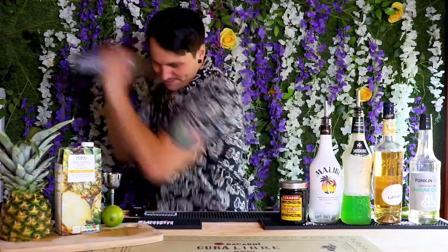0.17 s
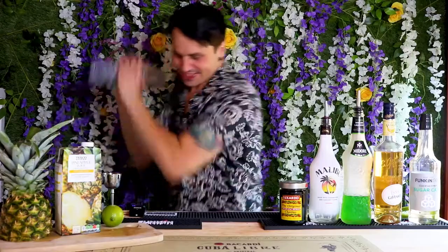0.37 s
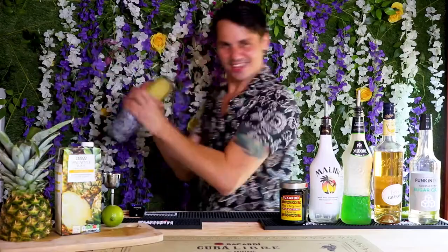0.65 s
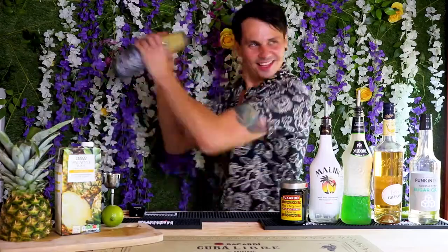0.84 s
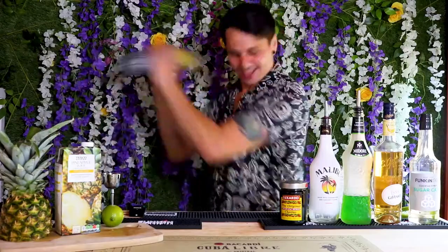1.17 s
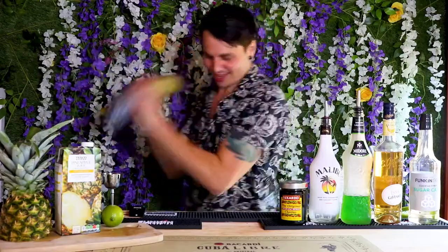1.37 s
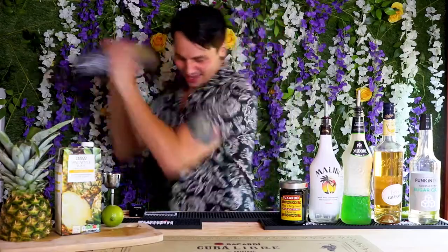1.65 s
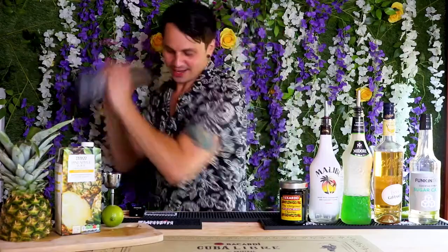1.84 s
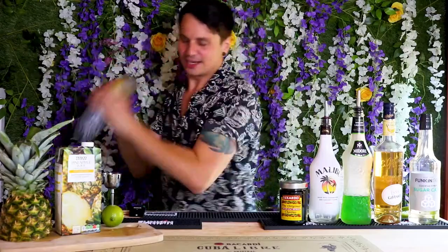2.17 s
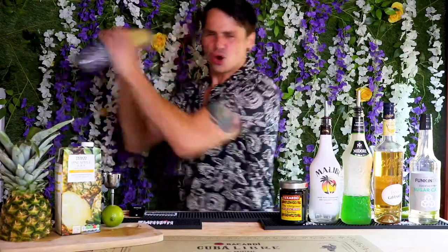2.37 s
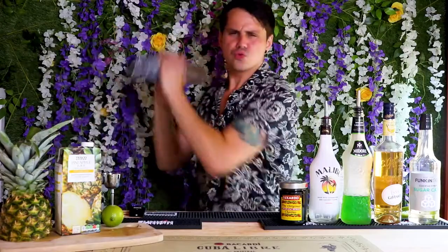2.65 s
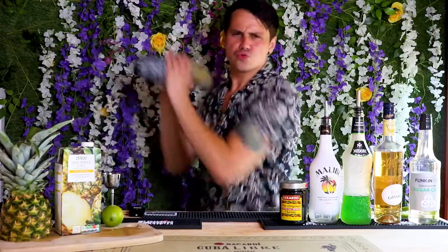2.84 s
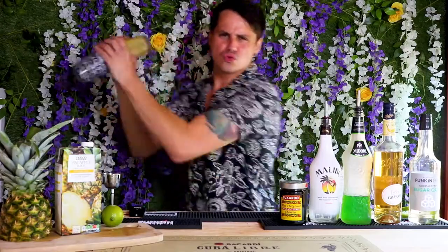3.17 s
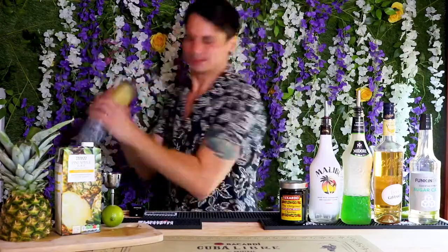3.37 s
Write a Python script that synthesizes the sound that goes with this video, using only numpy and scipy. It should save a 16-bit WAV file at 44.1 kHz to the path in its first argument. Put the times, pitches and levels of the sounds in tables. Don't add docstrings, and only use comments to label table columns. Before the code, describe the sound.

Vigorous cocktail shaking: ice cubes slam from end to end of a steel tin, ringing and tumbling after each blow, liquid gulping underneath; close, loud and clipped at peaks, short room tail, faint low hum.

```python
import sys
import numpy as np
from scipy import signal
from scipy.fft import rfft, irfft, next_fast_len
from scipy.io import wavfile
from scipy.ndimage import uniform_filter1d

SR = 44100
rng = np.random.default_rng(int(sys.argv[2]) if len(sys.argv) > 2 else 0)


def digitize_waveform(pressure):
    field = np.atleast_2d(pressure).T
    bounded = np.clip(field, -1, 1)
    quanta = np.round(bounded * 32767).astype(np.int16)
    wavfile.write(sys.argv[1], SR, quanta)


def volts(x):
    e = np.asarray(x, float) / 20
    return 10 ** e


N = 154350


def unit(x):
    return x / np.sqrt(np.mean(x ** 2) + 1e-20)


def along(points, hz):
    f, v = np.transpose(points)
    return np.interp(np.log(hz + 1), np.log(f + 1), v)


def filtered(x, response):
    m = next_fast_len(N + SR // 2)
    return irfft(rfft(x, m) * response(np.fft.rfftfreq(m, 1 / SR)), m)[..., :N]


def patchy(x, depth_db):
    z = signal.stft(x, nperseg=256)[2]
    field = uniform_filter1d(rng.standard_normal(z.shape), 4, -2)
    field = uniform_filter1d(field, 9, -1)
    field = field + field[:1]
    return signal.istft(z * volts(depth_db * unit(field)), nperseg=256)[1][..., :N]


def shape(t, rise_s, t60_s):
    t = np.maximum(t, 0)
    return (1 - np.exp(-t / rise_s)) * volts(-60 * t / t60_s)


def add(bus, s, sound):
    part = bus[..., round(max(s, 0) * SR):][..., :sound.shape[-1]]
    part += sound[..., :part.shape[-1]]


# t/s, level/dB
HUM_LEVEL = [
    (.3, -45),
    (1.15, -46),
    (1.65, -53),
    (2.3, -46),
    (3.25, -43),
    (3.5, -48),
]


def fridge():
    t = np.arange(N) / SR
    hum = volts(np.interp(t, *np.transpose(HUM_LEVEL))) * np.sin(2 * np.pi * 104.3 * t)
    second = volts(-64.5) * np.sin(2 * np.pi * 130.4 * t)
    noise = rng.standard_normal((3, N))
    rumble = filtered(noise[0] + 0.5 * noise[1:], lambda hz: hz / (hz + 30) / (1 + (hz / 420) ** 4))
    return np.sqrt(2) * (hum + second / np.sqrt(2)) + volts(-57) * unit(patchy(rumble, 1.9)) \
        + (1 - 1 / np.sqrt(2)) * np.sqrt(2) * second


# f/Hz, time to fall 60 dB/s
ROOM_DECAY = [(300, 0.22), (12000, 0.27)]


def room(x):
    step, delay = round(0.12 * SR), 200
    wet = np.zeros((2, N))
    padded = np.pad(x, ((0, 0), (step, 2 * step)))
    for start in range(0, N + step, step):
        hz, t, z = signal.stft(rng.standard_normal((2, SR // 3)), SR, nperseg=256)
        decay = volts(-60 * t / along(ROOM_DECAY, hz)[:, None])
        tail = signal.istft(z * decay, SR, nperseg=256)[1]
        piece = padded[:, start:start + 2 * step] * np.sqrt(np.hanning(2 * step))
        answer = signal.fftconvolve(piece, tail / np.linalg.norm(tail[0]), axes=1)
        add(wet, (start - step + delay) / SR, answer[:, max(step - start - delay, 0):])
    return wet


# t/s, level/dB
SPRAY_BURSTS = [
    (1.727, -14),
    (3.221, -13),
]


def spray():
    bus, t = volts(-41) * rng.standard_normal((2, N)), np.arange(SR // 4) / SR
    for s, db in SPRAY_BURSTS:
        add(bus, s, volts(db) * shape(t, 0.002, 0.1) * rng.standard_normal((2, len(t))))
    return filtered(bus, lambda hz: 1 / (1 + (8000 / (hz + 1)) ** 4))


# t/s, length/s, level/dB
SLOSH_HITS = [(0.098, 0.04, -33.5), (0.163, 0.31, -34.5), (0.334, 0.062, -31.5), (0.458, 0.19, -34.5),
              (0.63, 0.11, -29.5), (0.735, 0.034, -30.5), (0.828, 0.062, -32.5), (0.918, 0.037, -35),
              (1.001, 0.17, -31.5), (1.236, 0.055, -37), (1.384, 0.064, -28.5), (1.573, 0.048, -29.5),
              (1.68, 0.19, -31), (1.911, 0.16, -31.5), (2.135, 0.035, -26), (2.207, 0.066, -35),
              (2.413, 0.11, -31.5), (2.524, 0.084, -26), (2.645, 0.048, -30.5), (2.866, 0.02, -30),
              (2.908, 0.29, -34.5), (3.149, 0.026, -22.5), (3.236, 0.025, -27), (3.326, 0.096, -29),
              (3.43, 0.092, -33)]
# t/s, level/dB, f/Hz
AIR_BUBBLES = [
    (0.048, -37.5, 275),
    (.26, -34, 503),
    (.46, -27, 580),
    (0.651, -28, 481),
    (1.389, -27, 520),
    (1.86, -38, 304),
    (1.965, -30.5, 335),
    (3.145, -23.5, 577),
    (3.35, -33, 502),
]
# f/Hz, level/dB
WASH_COLOUR = [(88, -55), (150, -22), (624, -3.5), (883, -0.5), (1200, 0), (1600, -7), (2080, -19),
               (3520, -120)]


def drink():
    t, short = np.arange(N) / SR, np.arange(SR // 10) / SR
    power, bubbles = np.full(N, volts(-44) ** 2), np.zeros(N)
    for s, length, db in SLOSH_HITS:
        swell = 0.3 * length
        power += volts(db) ** 2 * np.exp(-((t - s - swell) / swell) ** 2)
    for s, db, hz in AIR_BUBBLES:
        rising = np.sin(2 * np.pi * hz * short * (1 + 2.17 * short))
        add(bubbles, s, volts(db) * shape(short, 0.0017, 0.14) * rising)
    noise = rng.standard_normal((3, N))
    wash = filtered(noise[0] + 0.21 * noise[1:], lambda hz: volts(along(WASH_COLOUR, hz)))
    return unit(patchy(wash, 3.2)) * np.sqrt(power) + bubbles


# t/s, level/dB, f/Hz
CHATTER_RUNS = [(.196, -22, 3770), (.635, -23, 2880), (.73, -23, 4600), (1.148, -23.5, 4400),
                (1.148, -31, 6550), (1.385, -26.5, 3270), (2.05, -23.5, 4250), (2.29, -24.5, 3730),
                (2.688, -30.5, 6500), (2.92, -26.5, 3300), (3.261, -25.5, 3350)]


def chatter():
    bus, t = np.zeros((2, N)), np.arange(SR // 10) / SR
    for s, db, hz in CHATTER_RUNS:
        taps = rng.standard_normal((3, len(t))) ** 3 / (1 + (t / 0.05) ** 6)
        ringing = signal.lfilter(*signal.iirpeak(hz, 8, SR), taps[0] + taps[1:])
        add(bus, s, volts(db) * unit(ringing))
    return bus


# t/s, level/dB, f/Hz
FREE_RINGS = [
    (.49, -7, 2075),
    (1.235, -11, 2090),
    (1.594, -0.5, 2078),
    (2.152, -11.5, 2070),
    (3.02, -9, 2092),
    (3.165, -10, 2100),
]


def free_rings():
    bus, t = np.zeros((2, N)), np.arange(SR // 3) / SR
    grip = 1 / (1 + (t / 0.04) ** 8)
    for s, db, hz in FREE_RINGS:
        tone = np.sin(2 * np.pi * hz * t) + 0.23 * np.sin(4 * np.pi * hz * t)
        add(bus, s, volts(db) * shape(t, 0.012, 0.2) * grip * tone)
    return bus


def ticks():
    contacts_per_s, size = 1500, 256
    count, t = round(contacts_per_s * N / SR), np.arange(size) / SR
    at, size_u, side = rng.random((count, 3)).T
    scatter = rng.standard_normal((count, 1))
    blow_s, _, blow_hz, _ = np.transpose(BLOWS_FIRST + BLOWS_SECOND)
    last_blow = np.maximum(np.searchsorted(blow_s, at * N / SR) - 1, 0)
    struck_hz = blow_hz[last_blow][:, None]
    same_cube = (side[:, None] * count % 1 < 0.2) & (struck_hz > 2300)
    any_hz = 3800 * np.exp(0.527 * scatter).clip(0.3, 3.5)
    hz = np.where(same_cube, struck_hz * np.exp(0.17 * scatter), any_hz)
    level_db = -2.9 * np.log(size_u[:, None] + 0.08)
    rings = volts(level_db - 60 * t * hz / 15) * np.sin(2 * np.pi * hz * t)
    lag = np.round(0.00013 * SR * (side - 0.5)).astype(int)[:, None]
    index = (at * N).astype(int)[:, None] + np.arange(size) + size
    sides = [np.bincount((index + k * lag).ravel(), rings.ravel(), N + 3 * size)[size:][:N] for k in (1, -1)]
    return unit(np.array(sides))


def tumble(fizz):
    t, power = np.arange(SR // 3) / SR, np.full(N, volts(-25.5) ** 2)
    for s, _, _, tumble_db in BLOWS_FIRST + BLOWS_SECOND:
        add(power, s - 0.005, (volts(tumble_db) * shape(t, 0.0088, 0.21)) ** 2)
    fizz_share = 0.22
    drive = np.sqrt(1 - fizz_share) * ticks() + np.sqrt(fizz_share) * fizz
    return patchy(drive, 2) * np.sqrt(power)


# t/s, peak level/dB, ring f/Hz, level of the tumble after it/dB
BLOWS_FIRST = [(0.0358, -1.5, 2210, -18.5), (0.1012, 2, 2110, -17), (0.1516, -10, 2140, -12),
               (0.1979, 3, 2410, -14.5), (0.2389, 5, 2205, -10), (0.3306, -6, 1910, -17),
               (0.4324, -27, 2080, -18), (0.4594, -7, 2230, -10.5), (0.5342, 8.5, 4300, -17),
               (0.5591, 11.5, 3730, -22), (0.6374, -2, 1820, -11), (0.7322, 0, 2180, -19.5),
               (0.7597, -5, 2110, -19), (0.7991, -18, 2530, -16.5), (0.8235, -15, 2060, -13.5),
               (0.8584, 1.5, 2140, -19.5), (0.9213, -0.5, 4040, -17.5), (1.0001, -21, 1980, -22),
               (1.0251, -9, 2210, -11.5), (1.1074, -20, 2190, -11.5), (1.1847, 4, 2106, -12.5),
               (1.2885, 0, 3800, -11), (1.3264, 6, 3560, -18), (1.3708, 1, 2330, -15),
               (1.4935, 0, 1980, -21), (1.5594, 2.5, 3300, -15), (1.5843, -0.5, 2050, -17),
               (1.6736, -7, 1900, -14.5)]
# t/s, peak level/dB, ring f/Hz, level of the tumble after it/dB
BLOWS_SECOND = [(1.7318, -9, 2000, -10), (1.7757, 5, 2090, -16.5), (1.8219, -12, 1940, -13.5),
                (1.9104, 1, 2104, -12.5), (2.0163, 0.5, 2160, -15), (2.042, -4, 1820, -11),
                (2.1518, 8.5, 2070, -23), (2.301, -2, 2185, -25), (2.3314, -1.5, 2160, -27),
                (2.4441, 1, 2480, -10.5), (2.4661, 0, 1990, -38), (2.5118, -13, 1930, -16),
                (2.5395, -11, 2120, -10.5), (2.5938, -12, 2120, -19), (2.6467, 3.5, 2090, -20),
                (2.6861, 8, 4670, -42), (2.7979, -4, 3630, -43), (2.8679, 1, 1736, -17),
                (2.9221, 1, 3430, -17), (2.9625, -0.5, 2260, -13), (3.0124, -5, 2000, -17.5),
                (3.0713, -3, 2100, -14), (3.1211, -27, 2160, -15), (3.1486, -9, 2000, -14),
                (3.2259, 2.5, 3110, -13), (3.2543, 2, 3350, -17), (3.2758, -3, 4850, -11),
                (3.3406, 5.5, 3190, -13), (3.4379, 0.5, 1985, -13), (3.4714, -4, 2190, -16.5)]
# t/s, peak level/dB, ring f/Hz
SMALL_KNOCKS = [(0.2103, -11, 2370), (0.2295, -4.5, 2070), (0.2512, -10, 3860), (0.2857, -8, 2260),
                (0.35, -12, 2510), (0.4951, 1, 4170), (0.5717, -9, 3600), (0.627, -2, 2160),
                (0.6558, -8, 2700), (0.7406, -4, 2140), (0.7666, -5, 2230), (0.828, -5, 1995),
                (0.8383, -5, 2100), (1.0318, -22, 3150), (1.0432, -16, 2130), (1.1251, -4, 2230),
                (1.135, -1.5, 2130), (1.1504, -3.5, 2110), (1.1904, -1, 2230), (1.3466, -16, 2230),
                (1.3909, -3.5, 2250), (1.4031, -3, 3320), (1.6091, -20, 2035), (1.7418, -3, 2180),
                (1.751, 0.5, 2153), (1.7982, -3, 2140), (1.8307, -13, 2000), (1.8428, -6, 2160),
                (1.9139, -1, 2170), (1.9227, -7, 2160), (1.9503, -8, 2080), (2.0232, -3, 2100),
                (2.0542, -8, 3700), (2.0697, -5, 2065), (2.078, -19, 4340), (2.111, -2.5, 3480),
                (2.1461, -2.5, 2380), (2.1657, -9.5, 2060), (2.177, -20, 2080), (2.4192, -11, 2430),
                (2.4524, -16, 2500), (2.475, -6, 1980), (2.5202, -8, 2010), (2.556, -2.5, 2160),
                (2.5694, 3.5, 2150), (2.6427, -10, 2250), (2.6594, -11, 1980), (2.8938, -13, 2150),
                (2.9822, -9, 1720), (2.987, 3, 3280), (3.0437, -2, 2040), (3.0776, -10, 2070),
                (3.17, -2, 2123), (3.186, -6, 2180), (3.3073, -8.5, 2180), (3.3343, -7.5, 2100),
                (3.3534, -1, 3450), (3.3615, -4, 2230), (3.3903, -19, 2000), (3.4511, -11, 2170)]


def strikes():
    t = np.arange(SR // 16) / SR
    cracks, cubes = np.zeros((2, N)), np.zeros((2, N))
    hits = [row[:3] for row in BLOWS_FIRST + BLOWS_SECOND]
    hits += [(s, db + 2.5, hz) for s, db, hz in SMALL_KNOCKS]
    for s, db, hz in hits:
        burst = rng.standard_normal((3, len(t)))
        crack = burst[0] + volts(-1) * burst[1:]
        add(cracks, s - 0.001, volts(db - 9.5) * shape(t, 0.0013, 0.018) * crack)
        wobble, t60_s, cube_db = (0.16, 0.026 * 0.7, -6) if hz > 2600 else (0.08, 0.026, -4.5)
        wander = np.cumsum(burst[1]) * wobble + np.array([[0], [burst[2, 0]]])
        tones = np.sin(2 * np.pi * hz * t + wander) + 0.15 * np.sin(2.8 * np.pi * hz * t - wander)
        add(cubes, s, volts(db + cube_db) * shape(t, 0.00077, t60_s) * tones)
    return cracks, cubes


# f/Hz, width/Hz, level/dB
TIN_MODES = [(1235, 25, 6.5), (1950, 75, 2), (2085, 61, 12.5), (2230, 400, 6), (3300, 880, 5.5),
             (4170, 180, 5), (4590, 204, 2), (6330, 430, 1), (7180, 76, 2.5)]
# f/Hz, level/dB
ICE_COLOUR = [(400, -73), (1000, -15.5), (1650, -12), (3240, -10), (6460, -5.5), (11000, -8.5),
              (15500, -18.5)]


def tin(hz):
    modes = 1
    for centre, width, db in TIN_MODES:
        damping = 1j * hz * width
        modes = modes + volts(db) * damping / (centre * centre - hz * hz + damping)
    return volts(along(ICE_COLOUR, hz)) * modes


def ice():
    noise = rng.standard_normal((3, N))
    fizz = unit(noise[0] + volts(-1) * noise[1:])
    cracks, cubes = strikes()
    dull_cracks = filtered(cracks, lambda hz: 1 / (1 + 1j * hz / 6500))
    in_tin = filtered(tumble(fizz) + dull_cracks, tin) / np.std(filtered(fizz, tin))
    return in_tin + filtered(cubes + free_rings(), lambda hz: 1 / (1 + (900 / (hz + 1)) ** 4))


def scene():
    shaker = ice() + chatter() + drink() + spray()
    sides = np.array([[1], [-1]])
    shaker = filtered(shaker, lambda hz: np.exp(1j * np.pi * hz / (1 + hz / 12000) * 4.5e-5 * sides))
    return (shaker + volts(-4) * room(shaker) + fridge()) * volts(-1.25 * sides)


def band_limit(x):
    return signal.sosfilt(signal.butter(12, 15670, fs=SR, output="sos"), x)


def record(dry):
    overloaded = dry / (1 + np.abs(dry) ** 12) ** (1 / 12)
    mix = filtered(overloaded, lambda hz: hz < 15680)
    return band_limit(mix)


dry = scene()
out = record(dry)
digitize_waveform(out)
```